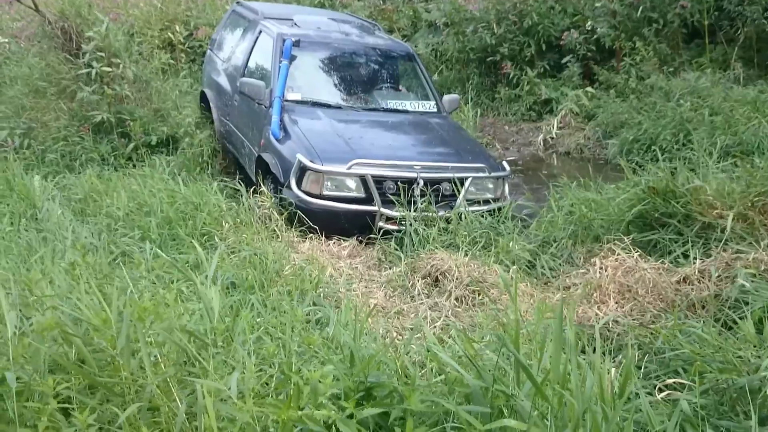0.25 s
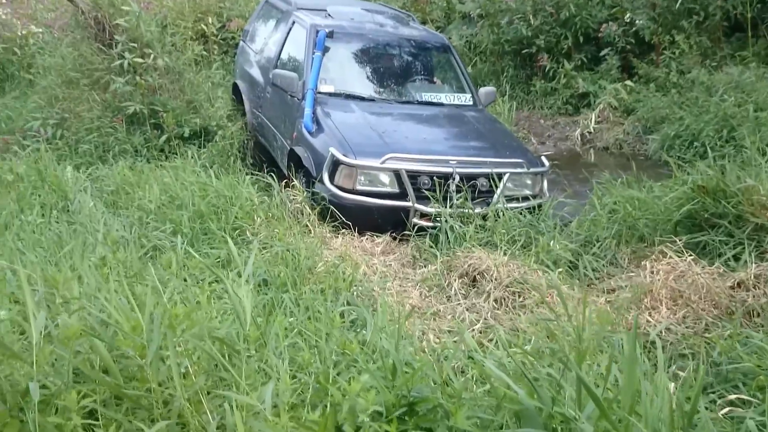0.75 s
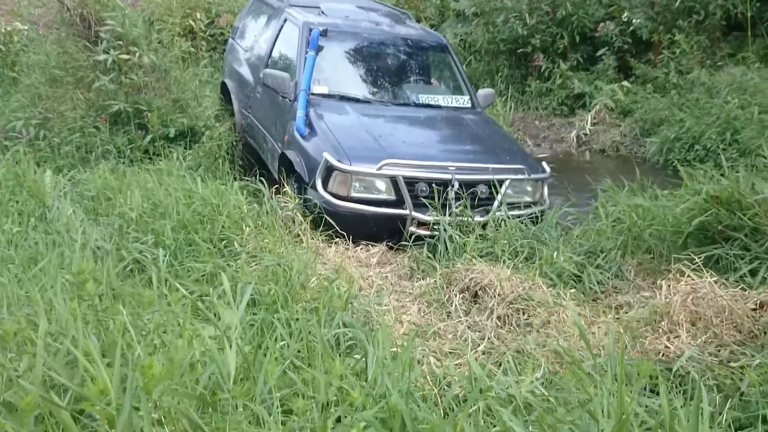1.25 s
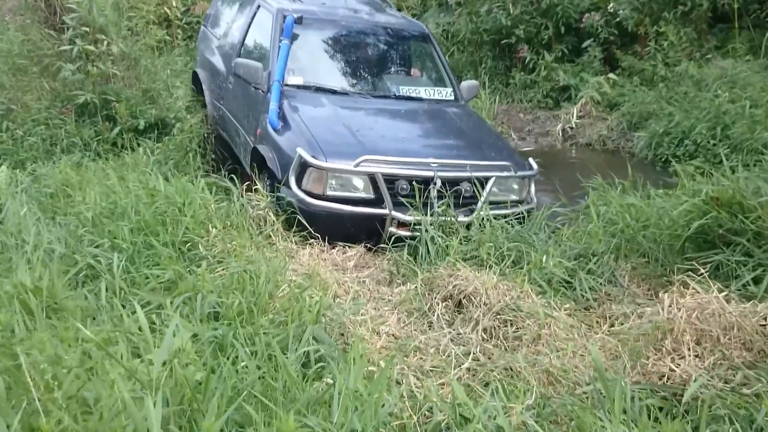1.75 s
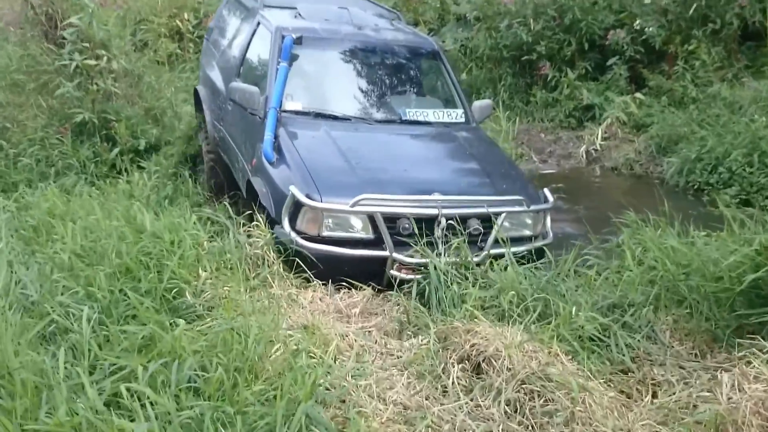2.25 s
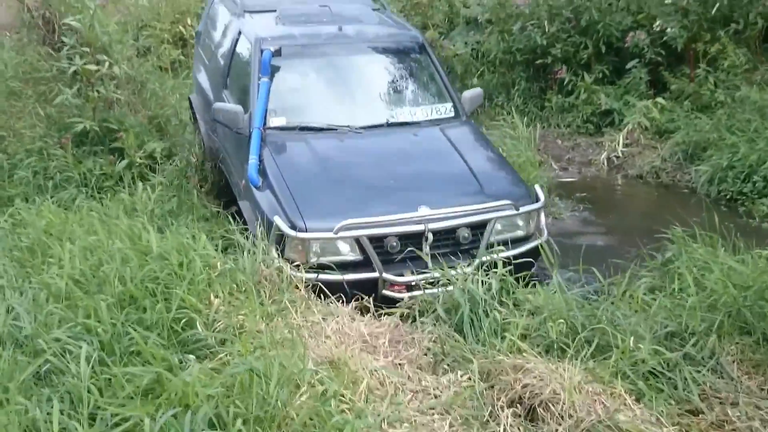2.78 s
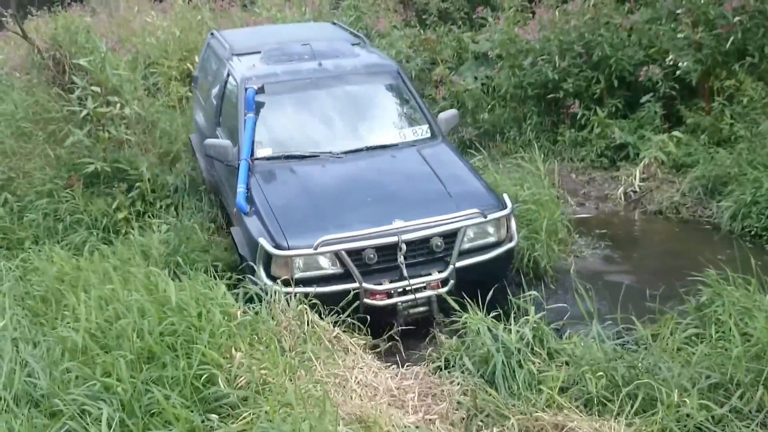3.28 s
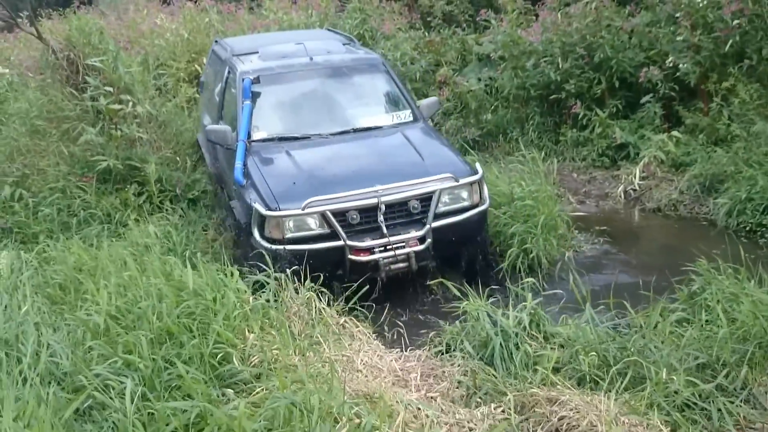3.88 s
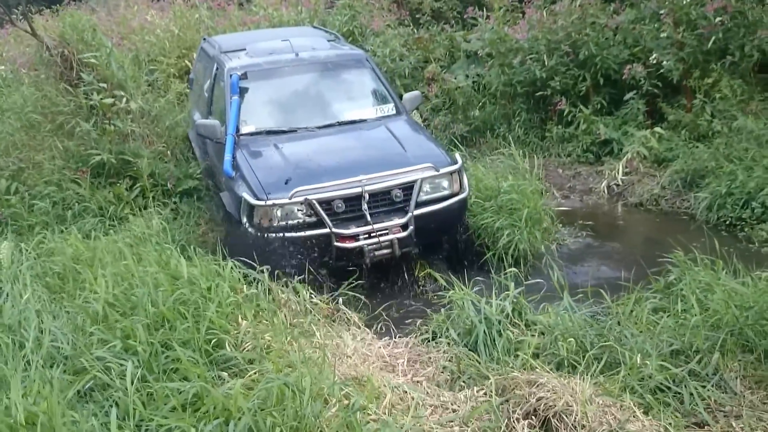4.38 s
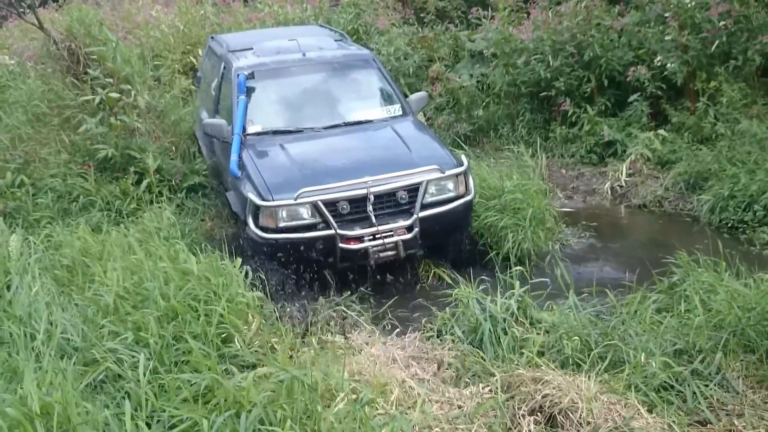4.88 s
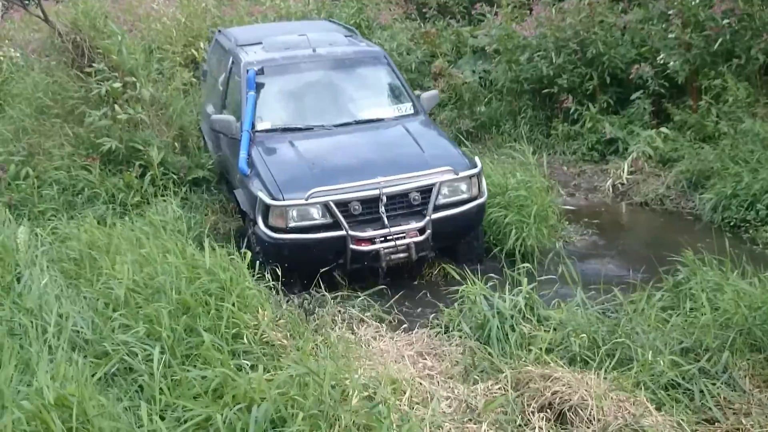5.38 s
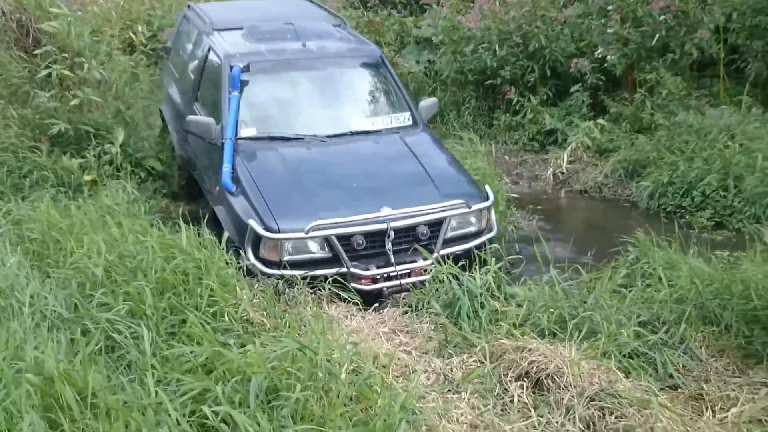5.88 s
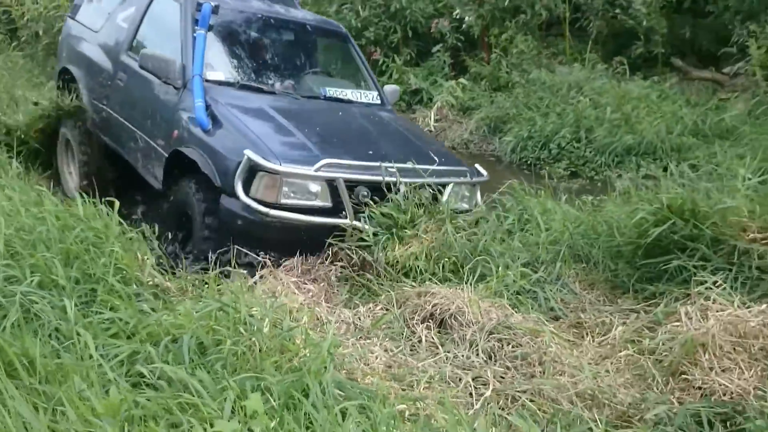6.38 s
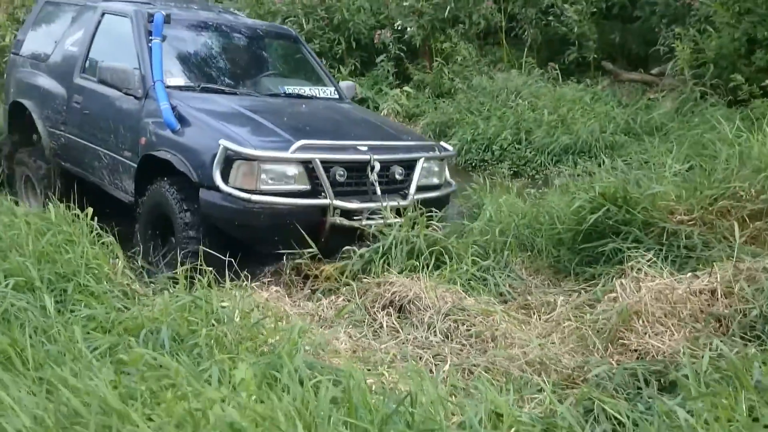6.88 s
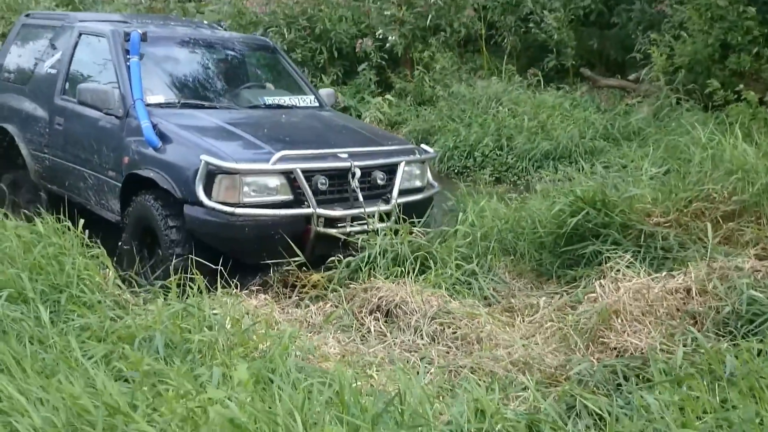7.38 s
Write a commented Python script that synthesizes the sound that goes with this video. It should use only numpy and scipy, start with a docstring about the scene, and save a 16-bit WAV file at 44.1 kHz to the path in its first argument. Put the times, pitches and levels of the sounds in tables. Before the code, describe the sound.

An off-road vehicle's engine dies down to a slow chug, revs up, sags, then climbs to a loud roar as tyres hiss through wet grass.

```python
"""An off-road car revs, sags and revs again in a muddy ditch a few metres away, heard in stereo.
Exhaust orders in step with the firings beat against an unevenly bladed fan on a slipping clutch.
Shaped noise makes the engine bay's roar and the hiss of tyres on wet grass, with small crackles.
A belt squeals faintly, stalks snap, a wheel throws water, and gusts thump the right microphone."""
import sys
import numpy as np
from scipy import signal
from scipy.fft import rfft, irfft, next_fast_len
from scipy.io import wavfile
from scipy.ndimage import uniform_filter1d

SR = 44100
rng = np.random.default_rng(int(sys.argv[2]) if len(sys.argv) > 2 else 0)


def master_out(mix):
    """Clip the mix to full scale and print it as 16-bit PCM to the path in sys.argv[1]."""
    frames = np.transpose(np.atleast_2d(mix))
    ceiling = np.clip(frames, -1, 1)
    pcm = np.round(ceiling * 32767).astype(np.int16)
    wavfile.write(sys.argv[1], SR, pcm)


N = 337365
HOP, SIZE = 256, 1024  # short-time spectrum: step and window [samples]

# how the engine runs: (time [s], firing rate [Hz], firing tone level [dB],
# force of the exhaust strokes [dB], block roar level [dB])
ENGINE = [(0, 67.64, -44, -73, -43.5), (.32, 56.44, -36, -49.5, -48), (.79, 41.8, -40.5, -50, -56),
          (1.05, 35.9, -47, -63, -58.5), (1.49, 30.24, -52, -57.5, -62), (1.64, 31.18, -52, -54, -54),
          (1.8, 37.5, -36, -45, -47.5), (1.98, 44.99, -29.5, -36.5, -47.5), (2.28, 55, -30.5, -38.5, -44),
          (2.53, 59.04, -32, -38, -43), (2.85, 57.82, -33.5, -38, -42), (3.39, 88.23, -31.5, -34.5, -36),
          (3.86, 112.3, -36, -36.5, -30.5), (4.03, 117.9, -33, -37, -31.5), (4.17, 135.3, -41, -31, -29),
          (4.3, 115.9, -40, -39, -29.5), (4.56, 91.4, -32.5, -35, -34), (4.77, 79.7, -41, -41.5, -38),
          (5.11, 61.06, -43, -44, -40.5), (5.22, 76.95, -33, -36.5, -40.5), (5.33, 88.25, -34, -37, -38.5),
          (5.54, 86, -31.5, -36.5, -36), (5.82, 87.6, -36.5, -45.5, -36), (6.05, 94.8, -31.5, -38.5, -35.5),
          (6.23, 109, -33, -43.5, -33.5), (6.47, 109, -31.5, -40, -32.5), (6.9, 125.1, -27.5, -36.5, -30),
          (7.44, 152.3, -19, -30, -28.5), (7.65, 159.8, -24.5, -25.5, -26.5)]
# cooling fan: (time [s], fastest blade tone the clutch lets through [Hz], tone level [dB], air rush level [dB])
FAN = [(0, 210, -35, -48.5), (.15, 205, -35, -51), (.4, 190.3, -48, -55), (.64, 160.4, -51.5, -62.5),
       (1.47, 148.5, -61, -70), (1.85, 160, -41, -49.5), (2.28, 170.8, -43.5, -47),
       (2.56, 179.7, -33.5, -40.5), (2.85, 174, -46, -44), (2.95, 186.9, -39, -43),
       (3.32, 250.2, -35.5, -40.5), (3.58, 268.3, -36, -35.5), (3.83, 303.8, -30, -35),
       (4.17, 342.6, -36, -33), (4.41, 313.4, -33.5, -33.5), (4.6, 258.1, -44.5, -39.5),
       (4.94, 196.9, -52, -40.5), (5.11, 200.1, -42.5, -44), (5.35, 264.2, -39.5, -39.5),
       (5.99, 260.2, -36.5, -38.5), (6.31, 307.6, -42, -37), (6.5, 300.7, -41.5, -35.5),
       (6.9, 328, -35.5, -35), (7.2, 350.4, -42.5, -32.5), (7.65, 396.7, -40, -31.5)]
# what pipe, body and ground pass on: (frequency [Hz], gain [dB])
BODY = [(15, -32), (60, -7), (125, 0.5), (160, -10.5), (200, 0), (240, -6), (300, -15), (350, -10.5),
        (420, -31), (490, -13.5), (560, -7), (650, -20.5), (800, -3.5)]


def gain_of(db):
    """Amplitude factor for a level in dB."""
    return 10 ** (np.asarray(db) / 20)


def evened(x):
    """Scale to an rms of 1."""
    return x / np.sqrt(np.mean(x ** 2) + 1e-20)


def read(points, hz):
    """Read a frequency table at hz, joining its points on a log frequency axis."""
    f, value = np.transpose(points)
    return np.interp(np.log(hz + 1), np.log(f + 1), value)


def curves(rows):
    """Turn each column of a time table into a curve over the whole scene."""
    s, *columns = np.transpose(rows)
    return [np.interp(np.arange(N) / SR, s, c) for c in columns]


def drift(hz):
    """Random wander of rms about 1, taking a new heading hz times a second."""
    steps = rng.standard_normal(int(hz * N / SR) + 2)
    return np.interp(np.arange(N) / SR * hz, np.arange(len(steps)), steps) * np.sqrt(1.5)


def noise(patchy_db, *spectra):
    """Two unrelated noises with shared drifting patches, in each of the colours."""
    frames, size = N // HOP + 5, next_fast_len(N)
    a, b, c, d, patches = rng.standard_normal((frames, SIZE // 2 + 1, 5)).T
    # smooth the patches over 14 frequency bins and 10 frames
    patches = uniform_filter1d(patches, size=14, axis=0)
    patches = evened(uniform_filter1d(patches, size=10, axis=1))
    z = np.array([a + 1j * b, c + 1j * d]) * gain_of(patchy_db * patches)
    patchy = signal.istft(z, nperseg=SIZE, noverlap=SIZE - HOP)[1][:, :N]
    spectrum = rfft(patchy, size)
    hz = np.fft.rfftfreq(size, 1 / SR)
    return [evened(irfft(spectrum * gain_of(read(s, hz)), size)[:, :N]) for s in spectra]


def tone(turns, db, waver_db):
    """A wavering sine; orders in step add up to dips of pressure."""
    return -np.sqrt(2) * gain_of(db + waver_db * drift(14)) * np.cos(2 * np.pi * turns)


def firing_turns():
    """Phase of the firings in turns: lightly wandering, and with early or late firings added."""
    hz = curves(ENGINE)[0]
    turns = np.cumsum(hz * (1 + 0.0029 * drift(30))) / SR
    scatter = .02  # rms share of the firing spacing
    return turns, turns + scatter * drift(45)


def exhaust(turns, scattered):
    """Exhaust orders in step, so that slow firings chug; half orders come from an uneven cylinder pair."""
    # orders above the first and between the firings: (multiple of the firing rate, relative level [dB])
    orders = [(.25, -25), (.75, -43), (1.249, -11), (1.749, -35), (2, 3), (3, -3), (4, 0.5), (5, -4.5),
              (6, -10), (7, -8), (8, -16.5)]
    # one cylinder pair fires harder: (multiple of the firing rate, relative level [dB])
    halves = [(.5, -10.5), (1.5, -10.5), (2.5, -11), (3.5, -12.5), (4.5, -10)]
    # half orders against the exhaust strokes: (time [s], relative level [dB])
    uneven = [(0, -2), (1, -10), (2, -9), (2.6, -3), (4.2, -10), (5, 0), (6.5, 8), (7.65, 5.5)]
    hz, first_db, force_db, _ = curves(ENGINE)
    uneven_db, = curves(uneven)
    out = tone(turns, first_db, 1.5)
    for k, db in orders:
        out += tone(k * scattered, force_db + db + read(BODY, k * hz), 2.03)
    for k, db in halves:
        out += tone(k * scattered, force_db + uneven_db + db + read(BODY, k * hz), 0.78)
    return out


def whines(scattered):
    """Alternator and gear whines, heard where they cross a panel resonance."""
    # (multiple of the firing rate, panel resonance [Hz], offset that halves the amplitude [Hz], peak level [dB])
    panels = [(24.6, 790, 90, -62), (33.3, 1300, 80, -60), (47, 1450, 60, -68), (41, 2050, 120, -63)]
    hz, out = curves(ENGINE)[0], np.zeros(N)
    for k, panel_hz, width, db in panels:
        resonance = 1 / (1 + ((k * hz - panel_hz) / width) ** 2)
        out += tone(k * scattered + 0.1 * drift(70), db, 2.4) * resonance
    return out


def fan():
    """Blade tone of the fan, with other shaft orders sounding because the blades are unevenly spaced."""
    # (multiple of shaft speed, relative level [dB])
    shaft_orders = [(1, -31), (2, -3.5), (3, -8), (4, -10.5), (6, -16), (7, -9.5), (8, -10), (9, -21)]
    blades, pulley = 5, 3.06  # pulley: blade tones per firing with the clutch locked
    blade_hz, blade_db, _ = curves(FAN)
    # the clutch slips but never outruns its drive
    blade_hz = np.minimum(blade_hz, pulley * curves(ENGINE)[0])
    shaft = np.cumsum(blade_hz * (1 + 0.003 * drift(25))) / SR / blades
    out = tone(blades * shaft, blade_db, 2.1)
    load_db = 38 * np.log10(blade_hz / 300) - 33  # blade loading climbs steeply with speed
    for k, db in shaft_orders:
        out += tone(k * shaft, load_db + db + read(BODY, k * blade_hz / blades), 1.1)
    return out


def engine_bay():
    """Noise of exhaust flow, block and fan air; colours change with revs, each firing puffs them."""
    # colours at high and at low revs, all (frequency [Hz], relative density [dB per Hz])
    flow_fast, flow_slow = [(25, -19), (60, -2.5), (100, 1), (150, 4.5), (200, 1), (250, 1), (340, -7.5),
                            (420, -17), (600, -37)], [(25, 0), (60, 0), (120, -1), (200, 4), (250, -5.5), (320, -12),
                                            (600, -36.5)]
    block_fast, block_slow = [(240, -33), (400, -4), (433, -6), (497, -19.5), (543, -18.5), (581, -6),
                              (789, 2), (970, 0), (1150, -8.5), (1630, -3.5), (1930, -10), (2540, -8),
                              (2830, -13), (4200, -23), (5460, -72), (9240, -120)], [(240, -31), (400, -6), (482, -5), (559, 1.5), (781, 2),
                                            (970, -3.5), (1380, -2), (1730, -4), (2220, -1), (2420, -7.5),
                                            (2860, -7), (3010, -38), (3250, -22), (4200, -43), (5460, -48),
                                            (9240, -120)]
    air_fast, air_slow = [(1760, -48), (3000, -2.5), (3440, -5), (3920, 0.5), (4400, 0.5), (5980, -1),
                          (6400, -3.5), (8300, -18.5), (10300, -14.5), (11300, -22), (13300, -12),
                          (15300, -32)], [(2200, -38), (3000, -5), (4000, -2.5), (5200, 0), (5700, -2),
                                        (6200, -6.5), (7400, -17), (15000, -40)]
    low_hz, high_hz = 55., 75  # firing rates between which the colours change

    hz, _, _, roar_db = curves(ENGINE)
    rush_db = curves(FAN)[-1]
    rumble_db = np.minimum(roar_db + 2.5, -33.)  # flow noise follows the roar up to a ceiling
    puff = np.exp(-(np.cumsum(hz) / SR % 1) / 0.69)
    revved = np.clip((hz - low_hz) / (high_hz - low_hz), 0, 1)

    def blend(patchy_db, fast_colour, slow_colour):
        """Crossfade two colours of one noise as the revs change."""
        fast, slow = noise(patchy_db, fast_colour, slow_colour)
        return revved * fast + (1 - revved) * slow

    flow = blend(0.97, flow_fast, flow_slow)
    block = blend(0.98, block_fast, block_slow)
    air = blend(0.96, air_fast, air_slow)
    out = gain_of(rumble_db + 1.26 * drift(9)) * flow * evened(1.17 + puff)
    out += gain_of(roar_db + 0.5 * drift(16)) * block * evened(5.7 + puff)
    return out + gain_of(rush_db + 0.66 * drift(18)) * air * evened(4.7 + puff)


def treads():
    """Level of the tyre hiss: rolling power plus a swell of power at each wheel spin."""
    # hiss of rolling tyres: (time [s], level [dB])
    rolling = [(0, -72), (.4, -76), (.8, -61), (1.45, -66), (2, -51), (2.9, -46), (3.41, -58), (3.8, -48),
               (5.2, -55), (6.4, -49.5), (7.65, -40.5)]
    # wheels spin up in the wet: (start of hold [s], hold [s], level [dB])
    spins = [(0.682, .01, -64), (1.14, .13, -49.5), (1.59, .26, -40), (2.36, 0.047, -44),
             (2.501, 0.18, -40), (3.62, .02, -43), (4.2, 0.33, -46.5), (4.86, 0.18, -47.5),
             (5.153, .01, -51), (5.5, 0.094, -47), (6.06, .1, -43.5), (6.579, .06, -46), (6.799, .05, -46)]
    rise, fall = 120, 91  # slopes before and after the hold [dB/s]
    t, power = np.arange(N) / SR, gain_of(curves(rolling)[0]) ** 2
    for s, hold, db in spins:
        below_db = np.maximum(rise * (s - t), fall * (t - s - hold))
        power = power + gain_of(db - np.maximum(below_db, 0)) ** 2
    return np.sqrt(power)


def tyres():
    """Hiss of treads on wet grass with dense small crackles."""
    # colour of hiss and crackles: (frequency [Hz], relative density [dB per Hz])
    hiss = [(1470, -24), (2500, -3), (3000, -1.5), (3800, -7.5), (4320, -4), (5420, -5), (7070, -3.5),
            (7930, 0), (9510, -1.5), (11100, -3.5), (12900, 0), (13700, 0), (15300, -1)]
    sizes = gain_of(7.7 * np.minimum(rng.exponential(1, (2, N)), 4))
    clicks = sizes * (rng.random((2, N)) < 1500 / SR)  # about 1500 a second per channel
    taps = irfft(gain_of(read(hiss, np.fft.rfftfreq(128, 1 / SR))))
    crackle = evened(signal.oaconvolve(clicks, np.roll(taps, 64)[None], "same"))
    return treads() * gain_of(1.4 * drift(14)) * (noise(0.78, hiss)[0] + 0.37 * crackle)


def field():
    """A faint bed of patchy noise that holds its level throughout."""
    # (frequency [Hz], relative density [dB per Hz])
    colour = [(120, -28), (200, 6.5), (429, -17), (563, -13), (753, -14), (887, -18), (1350, 7), (1590, -1),
              (2200, 6.5), (3930, -36), (5650, -3), (13300, -39), (15300, -61)]
    return gain_of(-59.5) * noise(1.9, colour)[0]


def wind():
    """Lumpy pressure, unrelated at the ports and stronger on the right; gusts thump."""
    # level before the lean to the right: (time [s], level [dB])
    breeze = [(0, -48), (.8, -44), (1.4, -55), (1.9, -38), (2.3, -47), (3.6, -38.5), (4.3, -50), (5, -38),
              (5.6, -47), (6.6, -37), (7.65, -44)]
    # thumps on the right microphone: (time [s], approximate peak [dB], length [s])
    gusts = [(3.58, -21, .012), (3.645, -22, .006), (3.83, -22, .005), (3.899, -18, .005),
             (3.916, -8.5, .0045), (3.94, -18, .006), (3.957, -13, .003), (3.972, -19, .005),
             (3.985, -14, .004), (4.035, -20, .006)]
    band = signal.butter(2, [6, 28], "band", fs=SR, output="sos")
    low = signal.sosfilt(band, rng.standard_normal((2, N)))
    lumps_db = 3 * drift(5.)
    lean_db = np.array([[-5.], [4.]])  # left, right
    out = evened(low) * gain_of(curves(breeze)[0] + lumps_db + lean_db)
    for s, db, length in gusts:
        u = np.arange(-3 * length, 5 * length, 1 / SR) / length
        eddy = uniform_filter1d(rng.standard_normal(2000), size=30)
        eddy = uniform_filter1d(eddy, size=30)[:len(u)]
        push = -np.cos(np.pi * u * 1.5) + 0.2 * evened(np.resize(eddy, len(u)))
        thump = gain_of(db) * push * np.exp(-u ** 2 / 1.1)
        out[1, round((s - 3 * length) * SR):][:len(u)] += thump
    return out


def belt():
    """A rough whistle: narrow noise carried on the squeal pitch."""
    # one table a squeal: (time [s], level [dB], pitch [Hz])
    squeals = [
        [(0, -59, 2295), (.14, -46.5, 2290), (.24, -48.5, 2198), (.34, -58, 2150), (.55, -58, 2070)],
        [(1.9, -57, 2170), (2.2, -62, 2160), (2.37, -50, 2150), (2.5, -42.5, 2220), (2.59, -46.5, 2230),
         (2.72, -60, 2194), (3, -59, 2195)],
        [(3.04, -50, 2550), (3.18, -47, 2650)],
    ]
    out, t = np.zeros(N), np.arange(N) / SR
    for rows in squeals:
        db, hz = curves(rows)
        start, end = rows[0][0], rows[-1][0]
        gate = np.clip(np.minimum(t - start + 0.049, end - t) / 0.063, 0, 1)
        fuzz = drift(240) + 1j * drift(240) + .8
        turns = np.cumsum(hz + 15 * drift(12)) / SR
        out += gate * gain_of(db) * (fuzz * np.exp(2j * np.pi * turns)).real
    return out


def snaps():
    """Snapping stalks and flung mud: one sharp break and a few milliseconds of rattle."""
    # (time [s], strength before colouring [dB], left over right [dB])
    breaks = [(0.0448, -30, 8), (0.6929, -18, 18), (0.9634, -34, 2.5), (2.0514, -20, -4), (3.112, -14, 5.5),
              (5.1428, -22, 4), (6.8055, -4, 4.5), (7.0716, -9, 8)]
    # colour of the clicks: (frequency [Hz], gain [dB])
    colour = [(300, -8), (900, 7), (1800, -12), (2800, -6), (4500, -14), (7000, -1), (10000, -11.5),
              (14000, -15)]
    out, t = np.zeros((2, N)), np.arange(500) / SR
    for s, db, pan_db in breaks:
        rattle = .2 * rng.standard_normal((2, 500)) * np.exp(-t / .0011)
        burst = (t == 0) + rattle
        sides_db = db + np.array([[.5], [-.5]]) * pan_db
        out[:, round(s * SR) + 20:][:, :500] += burst * gain_of(sides_db)
    taps = np.roll(irfft(gain_of(read(colour, np.fft.rfftfreq(256, 1 / SR)))), 128)
    return signal.oaconvolve(out, taps[None], "same")


def splash():
    """Water thrown by a wheel: band-passed random droplets that swell fast and die away."""
    # (time of the peak [s], level [dB], centre [Hz], decay [s])
    s, db, hz, decay = (5.46, -38, 2100, .05)
    t = np.arange(N) / SR - s
    drops = rng.standard_normal((2, N)) * (rng.random((2, N)) < .03)
    band = signal.butter(2, [hz / 1.72, hz * 1.4], "band", fs=SR, output="sos")
    swell = np.exp(-abs(t) / np.where(t < 0, decay / 3, decay))
    return gain_of(db) * evened(signal.sosfilt(band, drops)) * swell


def pair(x, other):
    """Two microphone ports: part shared with a phase lead, part from other paths."""
    # (frequency [Hz], left-right likeness, held within 0 to 1)
    likeness = [(30, 0.8), (100, 1.12), (500, 1.12), (1000, 1.02), (2000, 0.33), (4000, .5), (6000, 0),
                (8000, 0)]
    # (frequency [Hz], phase by which the left leads, before the aim factor [rad])
    left_lead = [(50, 0.66), (300, 0.65), (780, 0.75), (1210, 1.73), (1980, 1.48), (2580, 1.3),
                 (3790, 1.78), (4050, 2.84), (5940, 4.8)]
    # (frequency [Hz], left over right [dB])
    balance = [(60, -6.5), (92, -5.5), (140, -4), (210, -0.5), (330, -6.5), (500, 3.5), (760, -2.5),
               (1170, -0.5), (1790, 5), (2730, -4.5), (4170, -2.5), (6370, 13.5), (9740, 6), (14900, 2.5)]
    # the microphones turn as the car climbs: (time [s], left over right [dB], factor on the phase lead)
    aim = [(0, 1.5, 0.5), (1, -.5, 0.45), (1.998, 0, 0.64), (4, .5, 0.89), (7.65, 1.5, 1.01)]
    hz, t, (left, far) = signal.stft(np.array([x, other]), SR, nperseg=SIZE)
    s, pan_db, factor = np.transpose(aim)
    same = np.clip(read(likeness, hz), 0, 1)[:, None]
    # half of the balance goes to each side
    tilt = gain_of((read(balance, hz)[:, None] + np.interp(t, s, pan_db)) / 2)
    lead = read(left_lead, hz)[:, None] * np.interp(t, s, factor)
    right = same * left * np.exp(-1j * lead) + np.sqrt(1 - same ** 2) * far
    return signal.istft(np.array([left * tilt, right / tilt]), SR, nperseg=SIZE)[1][:, :N]


def scene():
    """Car, ground and bed reach both ports; wind and snaps are added to them directly."""
    turns, scattered = firing_turns()
    steady = exhaust(turns, scattered) + whines(scattered) + fan() + belt()
    wide = engine_bay() + tyres() + field() + splash()
    late = np.roll(steady, 300)  # the bank's echo reaches the right port
    return pair(steady + wide[0], late + wide[1]) + wind() + snaps()


def record(dry):
    """The recorder's band limit: a steep low-pass at 15430 Hz."""
    lowpass = signal.firwin(1023, 15430, window=("kaiser", 9), fs=SR)
    return signal.oaconvolve(dry, lowpass[None], "same")


dry = scene()
out = record(dry)
master_out(out)
```